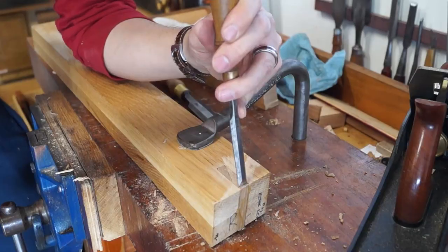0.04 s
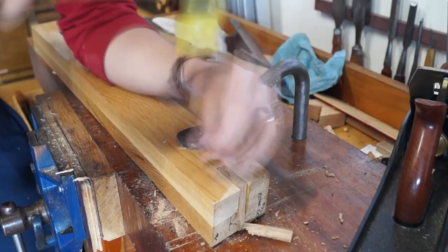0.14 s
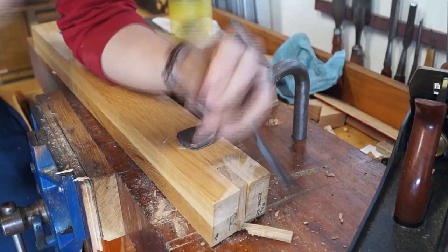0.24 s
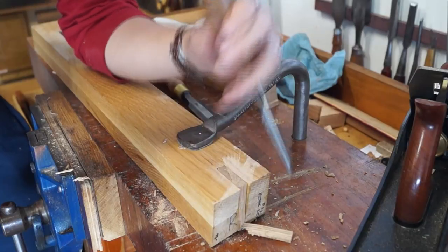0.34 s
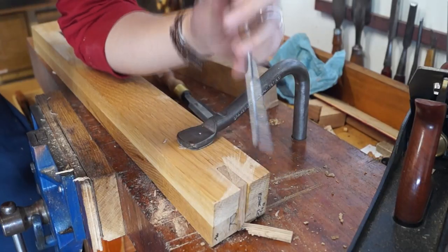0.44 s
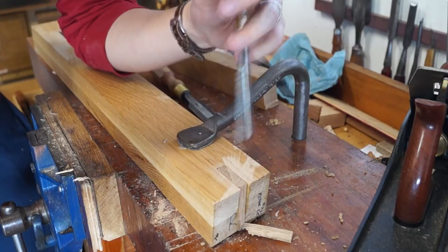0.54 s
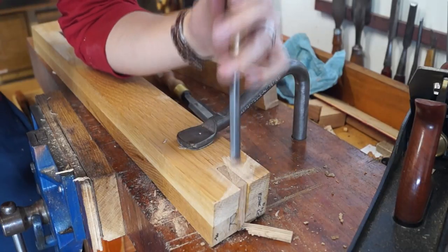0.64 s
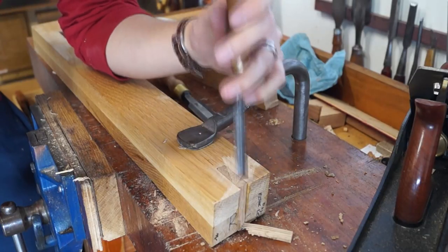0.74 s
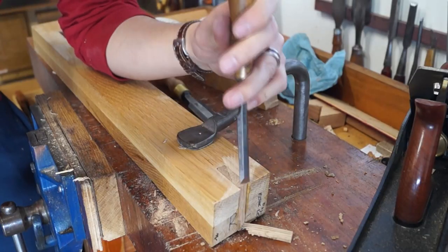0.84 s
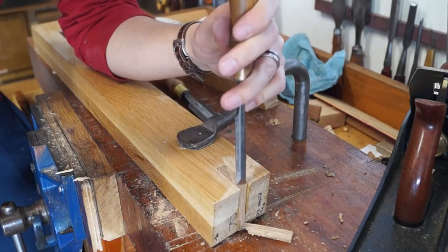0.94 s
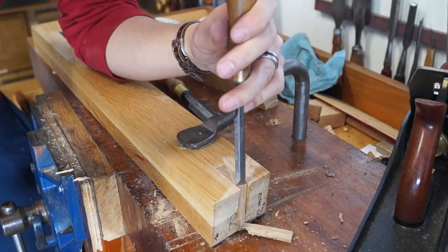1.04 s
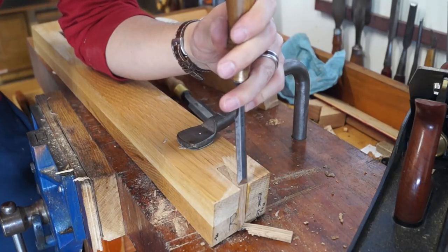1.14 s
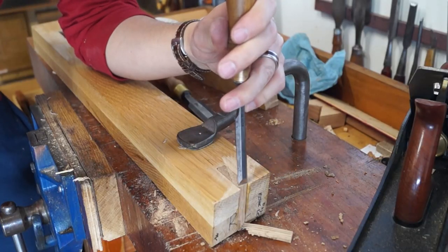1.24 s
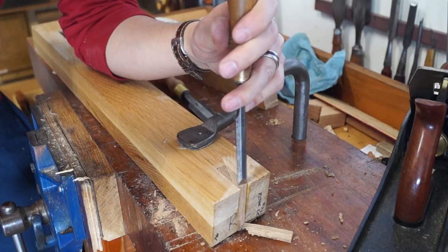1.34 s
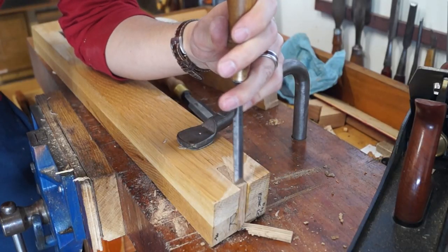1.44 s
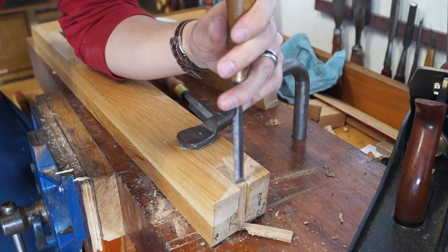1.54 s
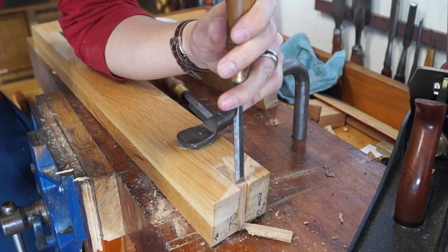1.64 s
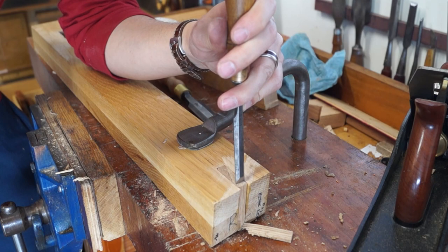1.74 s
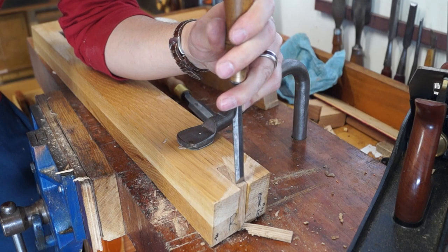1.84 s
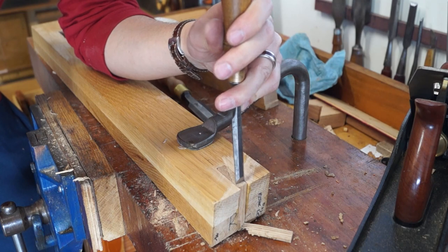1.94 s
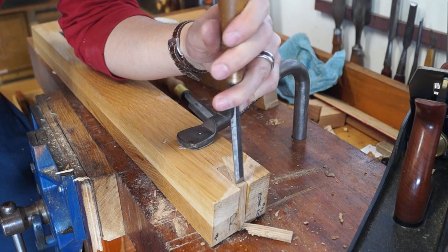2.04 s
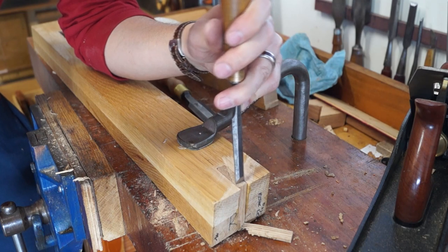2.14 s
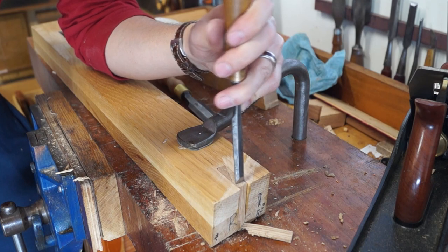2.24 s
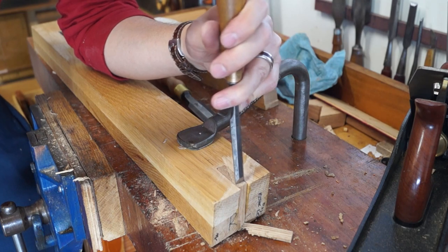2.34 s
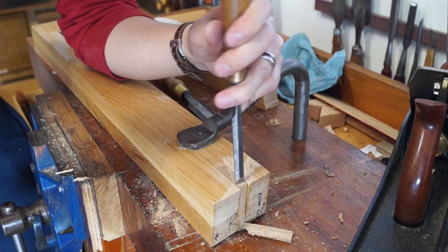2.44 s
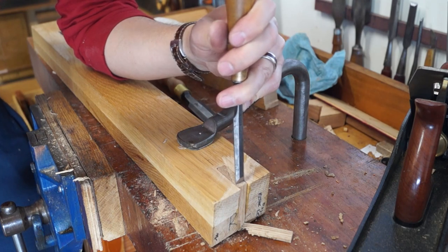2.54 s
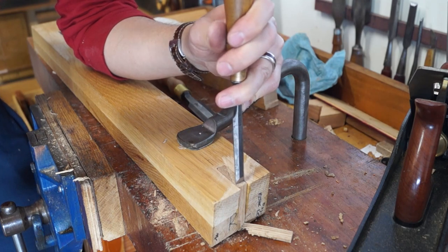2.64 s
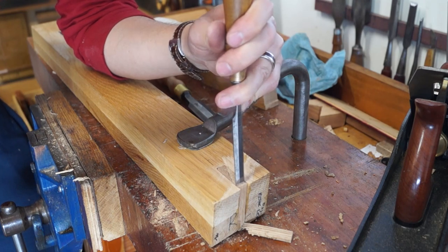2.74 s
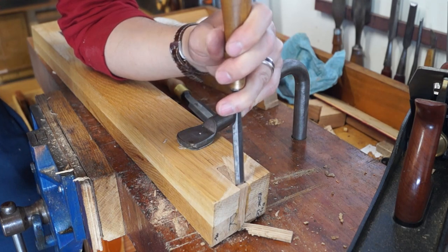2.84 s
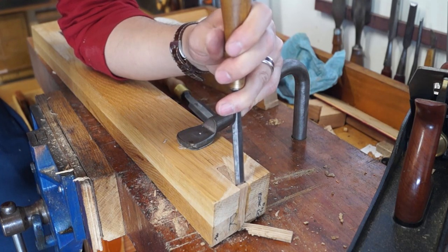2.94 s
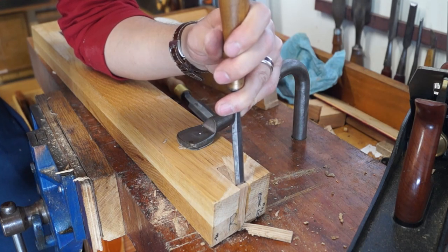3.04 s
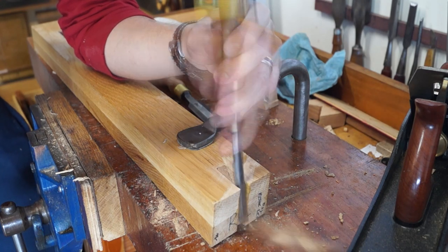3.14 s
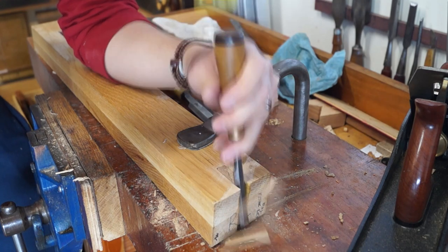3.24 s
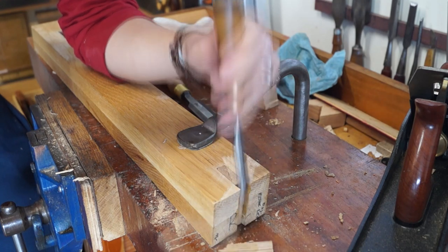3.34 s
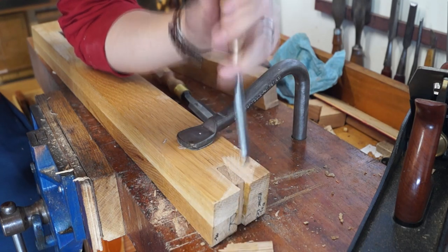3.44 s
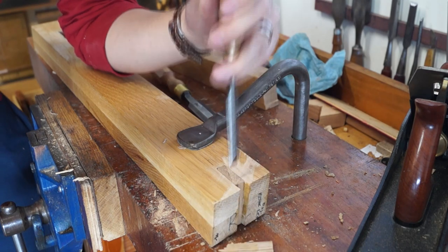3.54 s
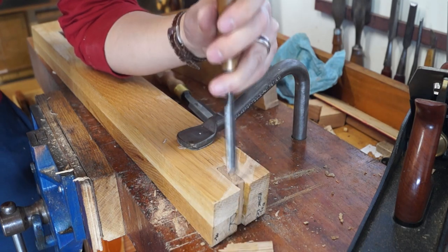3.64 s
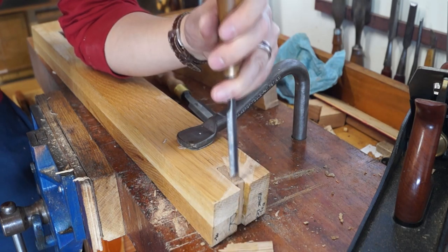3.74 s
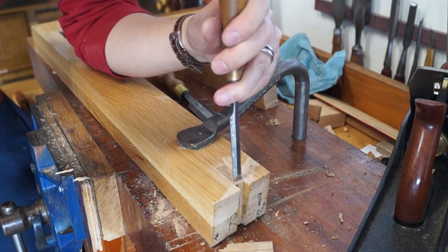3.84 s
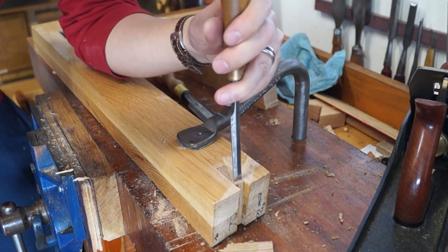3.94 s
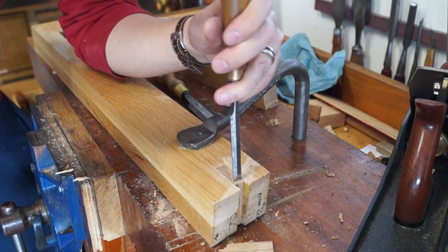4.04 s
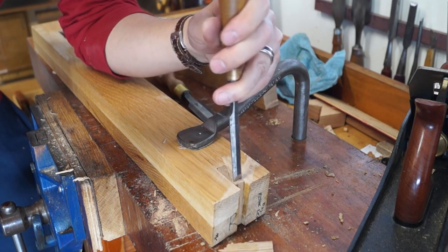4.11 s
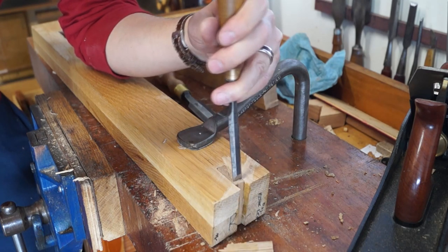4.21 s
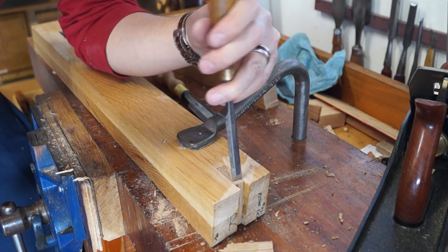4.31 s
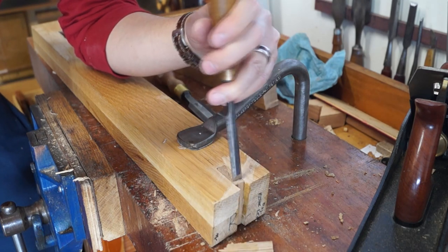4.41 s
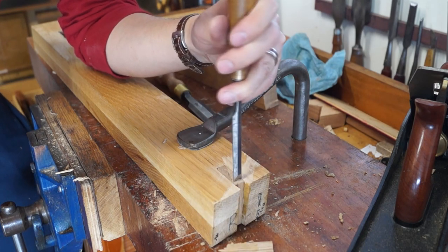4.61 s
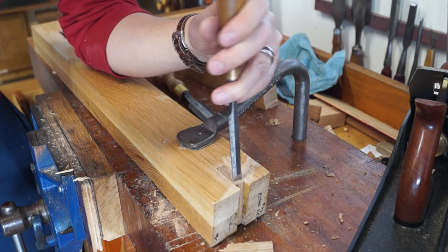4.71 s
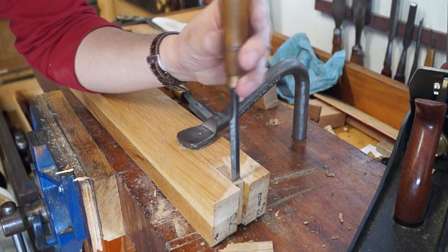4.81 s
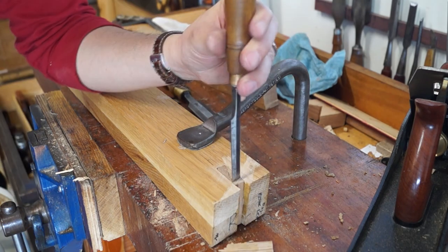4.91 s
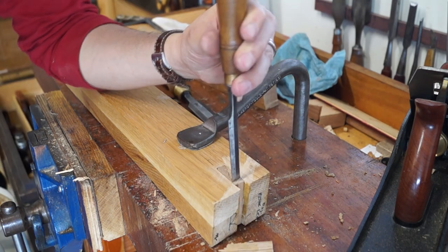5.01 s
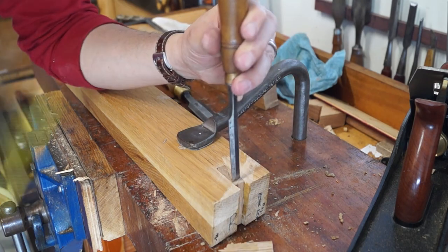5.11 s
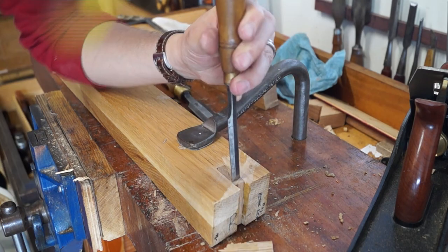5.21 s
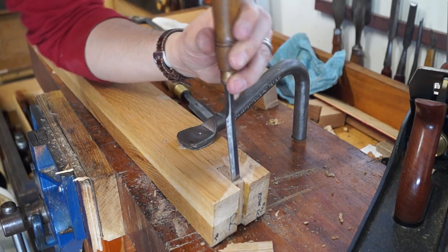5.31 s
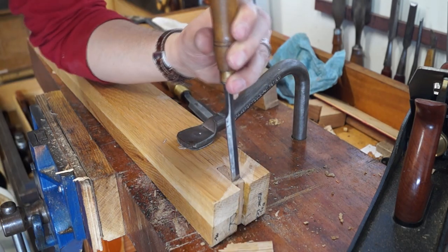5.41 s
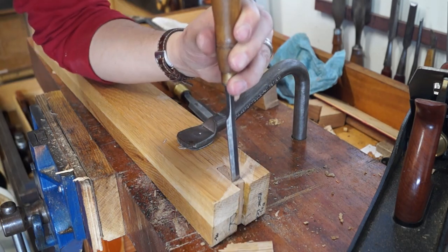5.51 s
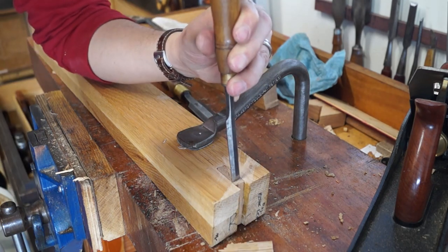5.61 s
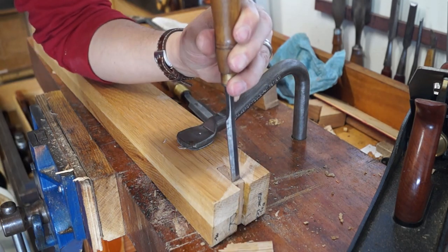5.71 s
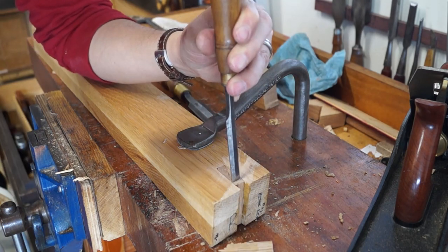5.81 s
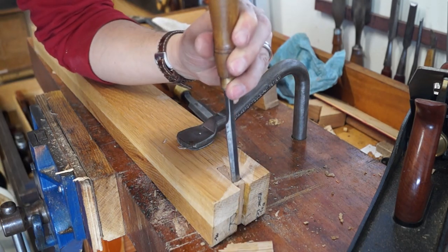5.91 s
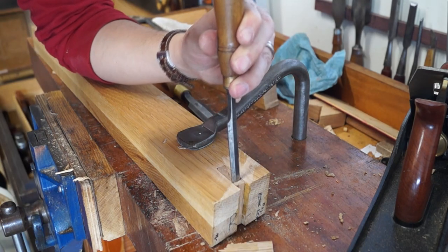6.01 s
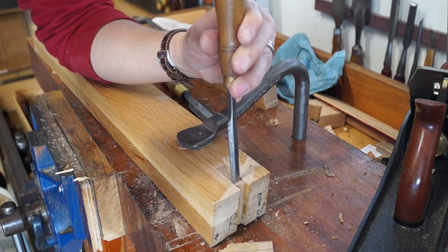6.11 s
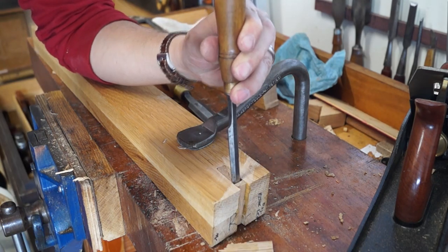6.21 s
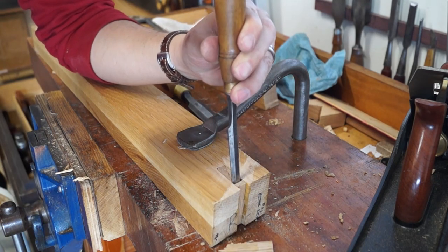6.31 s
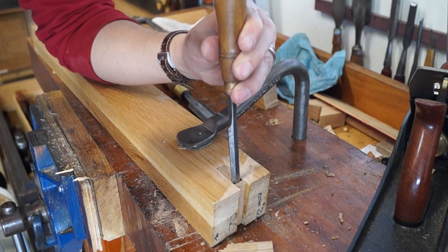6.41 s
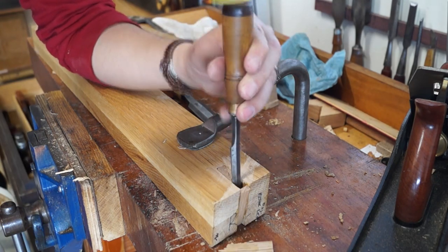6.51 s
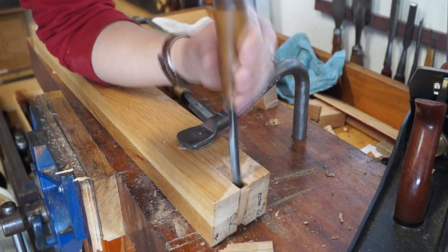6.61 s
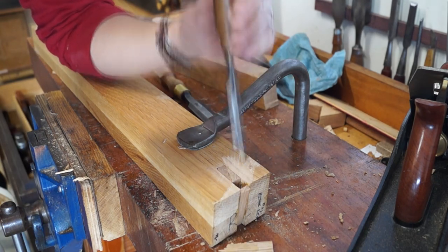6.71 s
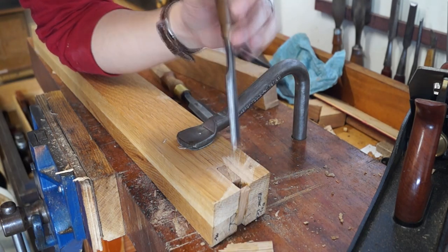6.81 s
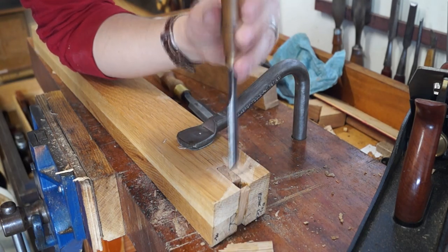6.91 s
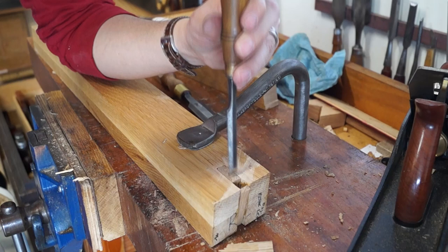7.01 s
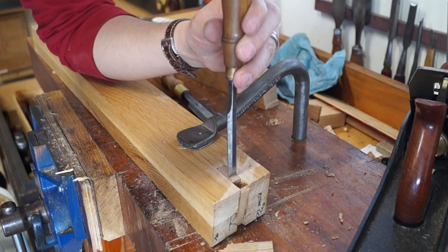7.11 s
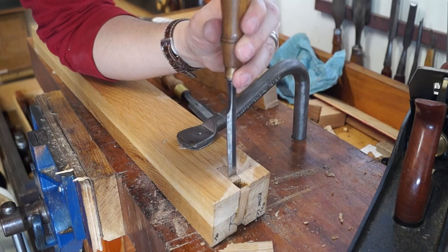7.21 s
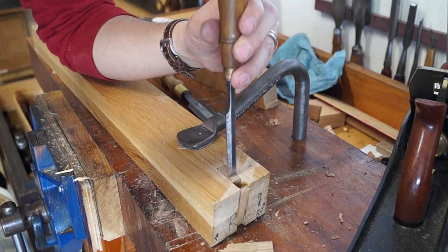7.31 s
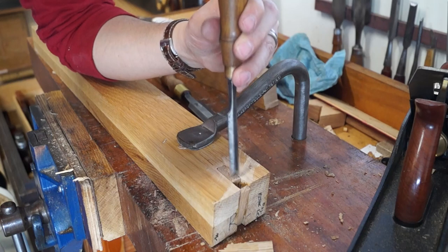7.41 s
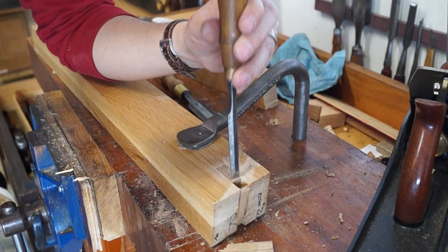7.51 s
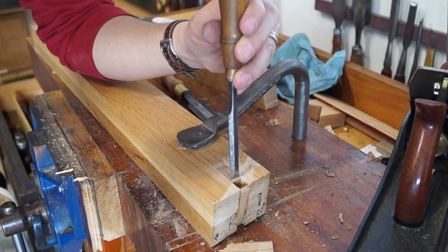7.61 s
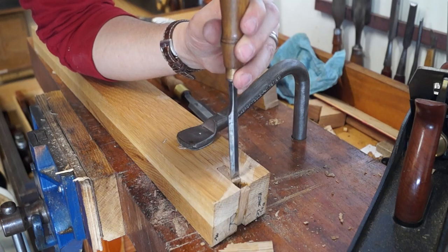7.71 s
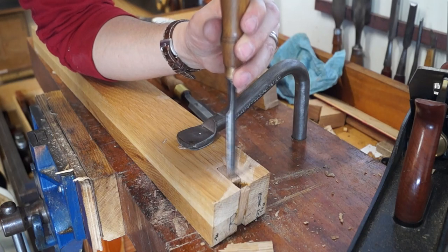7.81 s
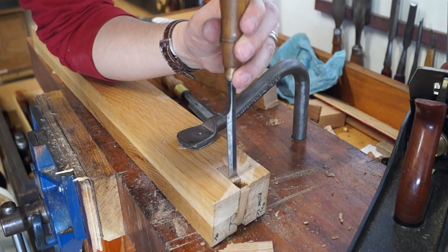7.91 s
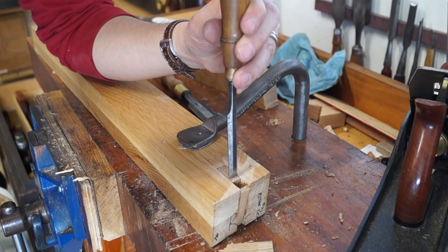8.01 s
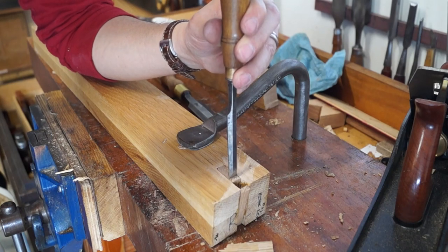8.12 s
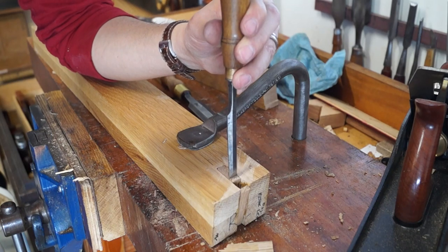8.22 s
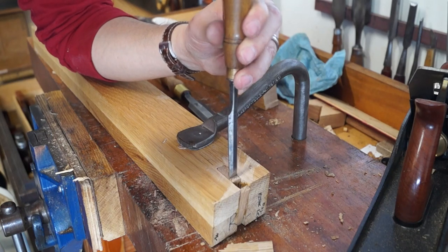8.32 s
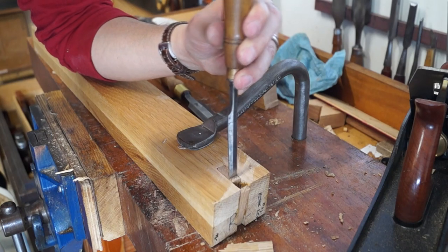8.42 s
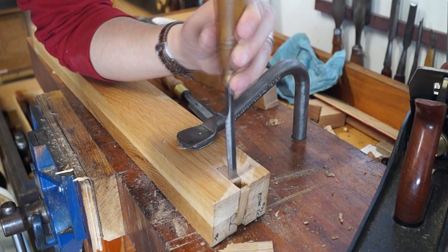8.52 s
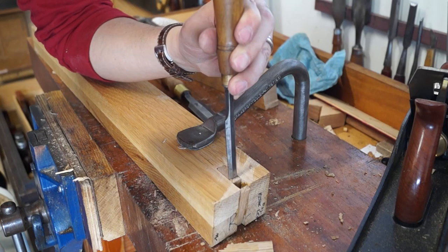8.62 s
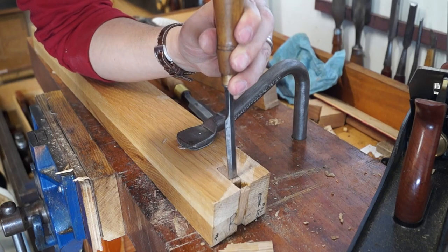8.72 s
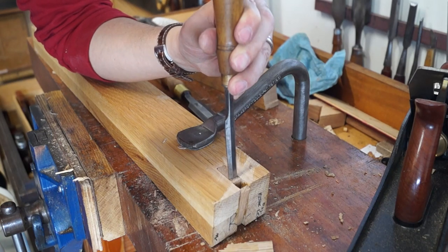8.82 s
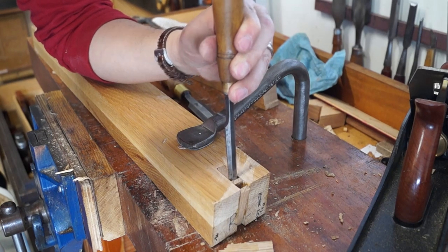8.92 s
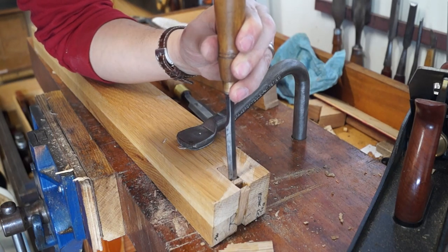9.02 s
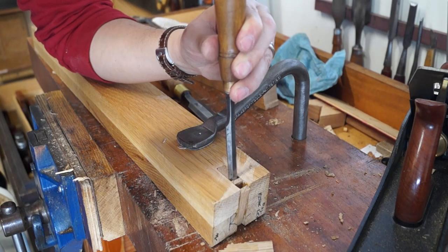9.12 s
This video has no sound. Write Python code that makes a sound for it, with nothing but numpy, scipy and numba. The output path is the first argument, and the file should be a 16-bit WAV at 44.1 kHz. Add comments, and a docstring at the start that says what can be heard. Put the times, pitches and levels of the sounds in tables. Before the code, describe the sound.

A close stereo view of chisel work in a small echoing workshop, over quiet, soft air noise. At 0.12 and 0.18 seconds two quick woody mallet blows land with crisp fibre snaps and a steel clink. Light touches follow at 0.7, 1.0 and 1.6, faint hoarse and whistling birds, and a dull low bench bump at 2.4. Firm knocks strike at 2.8 and 3.2, the second brighter and cracking. A bright metallic chatter comes at 3.8, a weaker one at 4.06. Around 4.7 a short wood scrape and snap lead into sleeve rustle, a clearer bird whistle and small taps until 5.35. Four heavy knocks fall at 5.57, 5.9, 6.2 and 6.5, the first ones fuller and the last sharper. Very faint taps and chirps fill 6.8 to 8, then two strong knocks at 8.56 and 8.9 end it, their echo fading.

```python
"""In a small workshop, a mallet drives a chisel into a hardwood rail clamped to a bench, close to the microphone.
Each blow sets wood, bench and blade ringing as decaying modes, while cracking fibres add clicks and jerky noise.
Between blows come light touches, clinks, a bump on the bench, a scrape and the rustle of a sleeve, as shaped noise
or modes. Faint gliding bird tones arrive only through the room's echo, over a soft coloured noise of air.
A late gain control and a fast limiter turn down loud peaks."""
import sys
import numpy as np
from scipy import signal
from scipy.fft import rfft, irfft, next_fast_len
from scipy.io import wavfile
from numba import njit

SR = 44100
rng = np.random.default_rng(int(sys.argv[2]) if len(sys.argv) > 2 else 0)


def put_to_file(sound):
    """Save the sound as 16-bit audio at rate SR, in the file named by the first command-line argument."""
    columns = np.atleast_2d(sound).T  # one column per channel
    safe = np.clip(columns, -1, 1)
    whole_steps = np.round(safe * 32767)
    wavfile.write(sys.argv[1], SR, whole_steps.astype(np.int16))


N = 403508
RING = np.arange(SR // 4) / SR  # time axis of every struck sound, s
CLINK_HZ = 7500  # crack pitch of a hard touch

# modes of the bench top: f/Hz, level/dB, t60/s
BENCH_MODES = [(98, -1.5, 0.11), (135.1, 3, 0.15), (174.7, -10.5, 0.27), (210, -4, 0.2), (266.7, -1, 0.12),
               (308, -3.5, 0.15), (391, 2, .13), (439, -0.5, 0.11)]
# modes of the clamped rail: f/Hz, level/dB, t60/s
RAIL_MODES = [(541, -1, 0.026), (624.3, -8.5, 0.13), (748, 3.5, 0.031), (854, -5, 0.086), (878, -1.5, 0.03),
              (1044, -6.5, 0.046), (1268, 0, 0.039), (1343, -1, 0.047)]
# spectral density of the knocked wood: f/Hz, level/dB per Hz
KNOCK_SPECTRUM = [(30, -47), (90, -17), (200, -12), (330, -8), (500, 3), (900, -0.5), (1600, -1),
                  (2300, -2), (3300, -12), (8000, -6.5)]


def undb(db):
    """Logarithmic level: decibels become an amplitude ratio."""
    return 10 ** (np.asarray(db) / 20)


def along(points, hz):
    """Logarithmic frequency axis: values are interpolated between (f/Hz, value) points."""
    f, value = np.transpose(points)
    return np.interp(np.log(hz + 1), np.log(f), value)


def fade(t, t60):
    """Exponential decay: amplitude is 60 dB down at t60."""
    return np.exp(-np.log(1000) * t / t60)


def swell(seconds):
    """Exponential build-up: a vibration approaches its full size with this time constant."""
    return 1 - np.exp(-RING / seconds)


def unit(x):
    """Energy normalisation: the squares sum to one."""
    return x / np.sqrt(np.sum(x ** 2))


def colour(x, spectrum):
    """Linear filtering: each frequency is weighted by the (f/Hz, level/dB) points."""
    hz = np.fft.rfftfreq(len(x), 1 / SR)
    return irfft(rfft(x) * undb(along(spectrum, hz)), len(x))


def around(x, hz, slope_db):
    """Broad resonance: the skirts on both sides of hz fall by slope_db an octave."""
    octaves = np.log2((np.fft.rfftfreq(len(x), 1 / SR) + 1) / hz)
    return irfft(rfft(x) * undb(-slope_db * np.abs(octaves)), len(x))


def noise(spectrum, size):
    """Coloured noise: filtered white noise is scaled to rms 1."""
    x = colour(rng.standard_normal(next_fast_len(size)), spectrum)[:size]
    return x / x.std()


def walk(rate, size):
    """Random modulation: straight lines join chance values drawn rate times a second."""
    t = np.arange(size) / SR * rate
    return np.interp(t, np.arange(8192), rng.standard_normal(8192))


def add(track, s, x):
    """Superposition: x is summed into the track from time s."""
    i = int(s * SR)
    track[i:i + len(x)] += x[:N - i]


def stereo(mid, side):
    """Spatial coherence: two close capsules hear alike in the bass and differ more in the middle range."""
    # side relative to mid: f/Hz, level/dB
    side_spectrum = [(30, -13.5), (70, -25), (130, -16.5), (400, -10), (1200, -5), (2500, -4.5), (5000, -6),
                     (12000, -9)]
    side = colour(side, side_spectrum)
    return np.array([mid + side, mid - side])


def ring(modes, detune=0.0069, scatter_db=-1.0):
    """Modal superposition: decaying cosines whose pitch and level shift with grip and depth of cut."""
    hz, db, t60 = np.transpose(modes)[:, :, None]
    shift, size, sign = rng.standard_normal((len(modes), 3)).T[:, :, None]
    phase = 2 * np.pi * hz * (1 + detune * shift) * RING
    # dividing by sqrt(t60) gives short and long modes like energy at a like level
    waves = np.cos(phase) * fade(RING, t60) / np.sqrt(t60)
    return unit(np.sum(np.sign(sign) * undb(db + scatter_db * size) * waves, axis=0))


def burst(spectrum, t60):
    """High modal density: a cloud of short-lived modes is decaying noise."""
    return unit(noise(spectrum, len(RING)) * fade(RING, t60))


def contact(x, hz):
    """Contact time: a softer contact pushes for longer and so leaves out the treble."""
    return signal.sosfilt(signal.butter(2, min(hz, SR / 3), fs=SR, output="sos"), x)


def radiate(x, hz):
    """Radiation efficiency: bench and rail are too small to push much air below hz."""
    return signal.sosfilt(signal.butter(2, hz, "high", fs=SR, output="sos"), x)


def shop_air():
    """Diffuse background: wide coloured noise whose level wanders."""
    # spectral density of the air: f/Hz, level/dB per Hz
    air_spectrum = [(25, -17.5), (55, -8.5), (140, -8), (290, -3), (450, -7), (800, -7.5), (2500, -18),
                    (7000, -23.5), (12000, -29.5), (16000, -38)]
    air = stereo(noise(air_spectrum, N), noise(air_spectrum, N))
    return air * undb(-54.5 + 0.6 * walk(4.7, size=N))


def reflections(build_s=0.00033, early_db=-1):
    """Reverberation: quick dull echoes of bench and tool wall, and a diffuse tail whose treble dies first."""
    # decay of the room: f/Hz, t60/s
    room_t60 = [(100, 0.38), (300, 0.4549), (800, 0.4317), (2000, 0.5223), (5000, 0.48), (9000, 0.37),
                (15000, 0.26)]
    hz, t, cells = signal.stft(rng.standard_normal(SR * 3 // 4), SR, nperseg=256)
    tail = signal.istft(cells * fade(t, along(room_t60, hz)[:, None]), SR)[1]
    t = np.arange(len(tail)) / SR
    early = undb(early_db) * contact(rng.standard_normal(len(t)), hz=2560) * fade(t, t60=0.16)
    return (tail + early) * (1 - np.exp(-t / build_s)) / np.sqrt(np.sum(tail ** 2))


def note(length_s, hz, glide, rough, scoop=0):
    """Frequency modulation: pitch glides (octaves/s) or scoops (octaves), and fast flutter makes it hoarse."""
    n = max(int(length_s * SR), 512)
    place = np.linspace(-1, 1, n)
    octaves = glide * length_s * place / 2 + scoop * place ** 2
    pitch = hz * 2 ** octaves * (1 + 0.135 * rough * walk(500, size=n))
    return signal.windows.tukey(n, .4) * np.sin(2 * np.pi * np.cumsum(pitch) / SR)


def birds():
    """Tonal sources: clear whistles, short falling chips, and hoarse scoops that sag and rise again."""
    # whistles: t/s, length/s, f/Hz, glide/(octaves/s), level/dB
    whistles = [(0, 0.057, 5200, 0.33, -54), (2.222, 0.26, 5770, -0.18, -52.5),
                (4.245, 0.22, 5520, -0.36, -59.5), (4.4, .16, 4190, -0.78, -66),
                (4.847, 0.15, 2455, 0.65, -34), (5.752, 0.11, 2475, 1.1, -40),
                (8.691, 0.13, 3600, -1.54, -49)]
    # chips: t/s, length/s, f/Hz, level/dB
    chips = [(5.077, 0.039, 2800, -38.5), (6.792, 0.048, 2914, -49.5), (7.02, 0.063, 2690, -56.5),
             (7.127, 0.066, 2894, -49), (7.906, 0.049, 3520, -53), (7.922, 0.067, 2745, -46),
             (7.99, 0.044, 2955, -46.5)]
    # scoops: t/s, level/dB
    scoops = [(.45, -50), (1.125, -48)]
    out = np.zeros(N)
    for s, length_s, hz, glide, db in whistles:
        add(out, s, undb(db) * note(length_s, hz, glide, rough=0.094))
    for s, length_s, hz, db in chips:
        add(out, s, undb(db) * note(length_s, hz, glide=-2.54, rough=0.34))
    for s, db in scoops:
        add(out, s, undb(db) * note(length_s=.41, hz=2120, glide=0, rough=0.39, scoop=.32))
    return out


def gesture(s, hold_s, rise_db_per_s, fall_db_per_s):
    """Exponential envelope: a movement swells up to time s, holds and dies away."""
    t = np.arange(N) / SR - s
    return undb(rise_db_per_s * np.minimum(t, 0) - fall_db_per_s * np.maximum(t - hold_s, 0))


def sleeve():
    """Friction noise: cloth rustles unevenly whenever the arm moves."""
    # spectral density of the cloth: f/Hz, level/dB per Hz
    cloth_spectrum = [(30, -11), (60, -4), (300, -1), (650, -4), (1200, -8.5), (1900, -12.5), (4000, -16.5),
                      (9000, -20.5), (16000, -29)]
    # moves of the arm: t/s at the end of the swell, hold/s, level/dB
    arm_moves = [(0, 0.02, -49), (1.186, 1.94, -57), (4.908, 0.54, -48.5), (8.344, 0.066, -57.5)]
    arm = sum(undb(db) * gesture(s, hold_s, rise_db_per_s=41.5, fall_db_per_s=26.5)
              for s, hold_s, db in arm_moves)
    return noise(cloth_spectrum, N) * undb(0.83 * walk(32, size=N)) * arm


def wood_scrape():
    """Stick-slip friction: wood catches and slides on wood in fine grains."""
    # spectral density of the scrape: f/Hz, level/dB per Hz
    scrape_spectrum = [(200, -29), (600, -8.5), (1000, 1.5), (2400, -4), (4500, -6), (8000, -13),
                       (15000, -19.5)]
    stroke = undb(-37.5) * gesture(s=4.708, hold_s=0.055, rise_db_per_s=319, fall_db_per_s=480)
    return noise(scrape_spectrum, N) * undb(1.4 * walk(400, size=N)) * stroke


def advance(cut_s):
    """Jerky motion: the blade's uneven advance dies along a Gaussian, 1/e at cut_s before the jerks."""
    return np.exp(-(RING / cut_s) ** 2) * undb(3 * walk(500, size=len(RING)))


def snap(spread_s=0.0013):
    """Dispersion: a click's pitches arrive a little apart, as fibres give way one after another."""
    hz = np.fft.rfftfreq(len(RING), 1 / SR)
    delay = spread_s * (.5 + np.abs(walk(300, size=len(hz))))  # group delay of each pitch, s
    return irfft(np.exp(-2j * np.pi * np.cumsum(delay) * hz[1]), len(RING))


def crack(crack_hz):
    """Fracture: fibres part with a sharp snap, then tear on unevenly, thin ones at a higher pitch."""
    # spectral density of the fibres: f/Hz, level/dB per Hz
    fibre_spectrum = [(300, 5), (1200, 4), (2800, 6.5), (5600, 2), (7500, 0.5), (10000, -0.5), (13000, -2),
                      (16000, -12)]
    click = around(colour(snap(), fibre_spectrum), crack_hz, slope_db=4.5)
    click = unit(click * fade(RING, t60=.1))
    fibres = around(noise(fibre_spectrum, len(RING)), crack_hz, slope_db=5.5)
    tearing = unit(contact(fibres, hz=9700) * advance(cut_s=.026))
    return click + undb(-4.0) * tearing


def edge(blade_db, crack_db, crack_hz):
    """Impulse excitation: as the edge bites, fibres crack and the steel rings."""
    # modes of the blade: f/Hz, level/dB, t60/s
    blade_modes = [(4200, -9.5, 0.011), (5500, -6.5, 0.0079), (5830, -7, 0.0067), (5930, -2, 0.024),
                   (6445, 8.5, 0.0277), (6560, 10.5, 0.029), (7950, -23, .008), (12000, -6, .025)]
    return undb(crack_db) * crack(crack_hz) + undb(blade_db) * ring(blade_modes, detune=0.0014)


def tap(hz, width_hz):
    """Selective resonance: a light touch wakes the wood's response near one pitch."""
    wood = ring(RAIL_MODES) + ring(BENCH_MODES) + burst(KNOCK_SPECTRUM, t60=0.09)
    b, a = signal.iirpeak(hz, hz / width_hz, fs=SR)
    return unit(signal.lfilter(b, a, wood * swell(0.00053)))


def taps():
    """Weak excitation: the tool lightly touches the work."""
    # touches: t/s, level/dB, f/Hz, bandwidth/Hz
    touches = [(0.7, -13, 980, 110), (1.044, -14.5, 433, 60), (1.606, -9, 550, 260),
               (5.033, -12.5, 714, 500), (5.241, -10, 880, 600), (5.308, -13.5, 1050, 704),
               (5.349, -14.5, 900, 600), (7.129, -18.5, 430, 60), (7.586, -21.5, 419, 60),
               (7.975, -18.5, 470, 90)]
    out = np.zeros(N)
    for s, level_db, hz, width_hz in touches:
        add(out, s, undb(level_db) * tap(hz, width_hz))
    return out


def clinks():
    """Delayed repetition: a bright steel clink comes with a faint lead-in, a strong echo 8 ms later and a weak
    one at 22 ms."""
    # clinks: t/s of the hit, blade level/dB, crack level/dB
    hits = [(.1275, 2.5, -8), (3.834, 12, -6), (4.059, -1.5, -15)]
    # arrivals of each clink: t/s from the hit, level/dB
    arrivals = [(-.0055, -14.5), (0, -2), (.008, 0), (.0225, -21)]
    out = np.zeros(N)
    for s, blade_db, crack_db in hits:
        for lag_s, arrival_db in arrivals:
            add(out, s + lag_s, undb(arrival_db) * edge(blade_db, crack_db, CLINK_HZ))
    return out


def bump():
    """Blunt impact: something heavy bumps the bench with a faint tick and a thud, and the top rings."""
    # spectral density of the thud: f/Hz, level/dB per Hz
    thud_spectrum = [(30, -33), (60, -12.5), (130, 5.5), (195, 0), (270, 2.5), (442, -11.5), (740, -0.5),
                     (1020, -5.5), (1200, -15.5), (2070, -20), (3200, -39), (6000, -52), (14000, -70)]
    tick = undb(-16) * crack(CLINK_HZ)
    thud = undb(21) * burst(thud_spectrum, t60=.08) * swell(.0015)
    bench = undb(16.5) * ring(BENCH_MODES) * swell(0.0086)
    out = np.zeros(N)
    add(out, 2.4118, tick + thud + bench)
    return out


def fibre_snaps():
    """Stress release: fibres snap on their own."""
    # snaps: t/s, level/dB, f/Hz
    snaps = [(0.126, 4.5, 7460), (0.1364, -5, 7500), (0.1696, -1.5, 7700), (2.453, -23, 9040),
             (4.764, -4, 1650)]
    out = np.zeros(N)
    for s, level_db, hz in snaps:
        add(out, s, undb(level_db) * crack(hz))
    return out


def knock(cutoff_hz, bench_db, handle_db, cut_s):
    """Coupled resonators: rail and handle answer almost at once and judder; the heavy bench builds up later."""
    # modes of the chisel handle: f/Hz, level/dB, t60/s
    handle_modes = [(1436, -5.5, 0.04), (1750, -0.5, 0.013), (1899, -1.5, 0.062), (1961, 8.5, 0.027),
                    (2089, 3, 0.018), (2160, -11, 0.027), (2650, -7, 0.014), (2931, 0, 0.042)]
    # spectral density of the bench's dull thump: f/Hz, level/dB per Hz
    thump_spectrum = [(30, -41), (55, -12), (95, -2), (170, -7.5), (270, 9), (400, 0.5), (800, -29.5)]
    judder = unit(noise(KNOCK_SPECTRUM, len(RING)) * advance(cut_s))
    wood = undb(-0.9) * ring(RAIL_MODES) + judder + undb(handle_db) * ring(handle_modes)
    bench = ring(BENCH_MODES) + undb(-7.5) * burst(thump_spectrum, t60=0.23)
    return contact(wood * swell(0.0016) + undb(bench_db) * bench * swell(0.012), cutoff_hz)


def mallet_blows():
    """Impact hardness: a harder contact passes more treble and rings the handle more."""
    # blows: t/s, force level/dB, contact cut-off f/Hz, bench level/dB,
    # crack level/dB, crack f/Hz, blade level/dB, length of cut/s
    blows = [(0.1206, 14.5, 2140, -17.5, -12, 9500, -36, 0.036),
             (0.1826, 13.5, 1530, -9, -40, 6000, -48, 0.015),
             (2.8176, 21.5, 2000, -12.5, -15, 10200, -55, 0.016),
             (3.1849, 18, 2800, -13.5, -2, 4740, -2, 0.014),
             (5.5728, 23.5, 1490, -0.5, -20.5, 6800, -60, 0.055),
             (5.9043, 26.5, 2230, -6.5, -18.5, 5540, -41, 0.035),
             (6.1873, 23, 2300, -12.5, -12, 5390, -17, 0.013),
             (6.4963, 19, 2660, -15.5, -8, 3500, -26, 0.021),
             (8.5644, 22, 2000, -5.5, -19.5, 5060, -44, 0.026),
             (8.8931, 23.5, 2230, -8.5, -15, 5700, -40, 0.018)]
    out = np.zeros(N)
    for s, force_db, cutoff_hz, bench_db, crack_db, crack_hz, blade_db, cut_s in blows:
        handle_db = -1 + 3.5 * np.log2(cutoff_hz / 2000)  # rises 3.5 dB for each octave of cut-off
        wood = knock(cutoff_hz, bench_db, handle_db, cut_s)
        add(out, s, undb(force_db) * (wood + edge(blade_db, crack_db, crack_hz)))
    return out


def scene():
    """Direct and reverberant sound: near work comes with its echo, birds only by way of the walls."""
    struck = taps() + clinks() + bump() + fibre_snaps() + mallet_blows()
    near = radiate(struck, hz=55) + sleeve() + wood_scrape()
    room = stereo(reflections(), reflections())
    sent = undb(-2.0) * near + birds()
    echo = signal.fftconvolve(sent[None], room, axes=1)[:, :N]
    lean_db = -0.33  # left relative to right
    balance = undb(np.array([[lean_db], [-lean_db]]) / 2)
    return (near + echo) * balance + shop_air()


@njit
def ducking(over_db, attack, release):
    """Asymmetric smoothing: gain reduction in dB follows a rise and a fall at separate rates."""
    out, held = np.zeros(len(over_db)), 0.
    for i in range(len(over_db)):
        held += (over_db[i] + 1e-9 - held) * (attack if over_db[i] > held else release)
        out[i] = held
    return out


def gain_control(x, ceiling_db, attack_s, release_s, lag_s=0):
    """Dynamic compression: both channels drop by the smoothed overshoot of the ceiling, lag_s late."""
    over_db = np.maximum(20 * np.log10(np.abs(x).max(axis=0) + 1e-9) - ceiling_db, 0)
    down_db = ducking(over_db, 1 - np.exp(-1 / (attack_s * SR)), 1 / (release_s * SR))
    t = np.arange(N) / SR
    return x * undb(-np.interp(t - lag_s, t, down_db))


def record(dry):
    """Limiting: late gain control lets onsets through, a fast limiter and soft clipping round them."""
    held = gain_control(dry, ceiling_db=-12, attack_s=0.0077, release_s=0.011, lag_s=0.013)
    held = gain_control(held, ceiling_db=-4.0, attack_s=.0001, release_s=0.012)
    rounded = held / (1 + held ** 4) ** (1 / 4)
    # steep cut above 16 kHz
    return signal.sosfilt(signal.ellip(8, .2, 90, 16000, fs=SR, output="sos"), rounded)


dry = scene()
out = record(dry)
put_to_file(out)
```